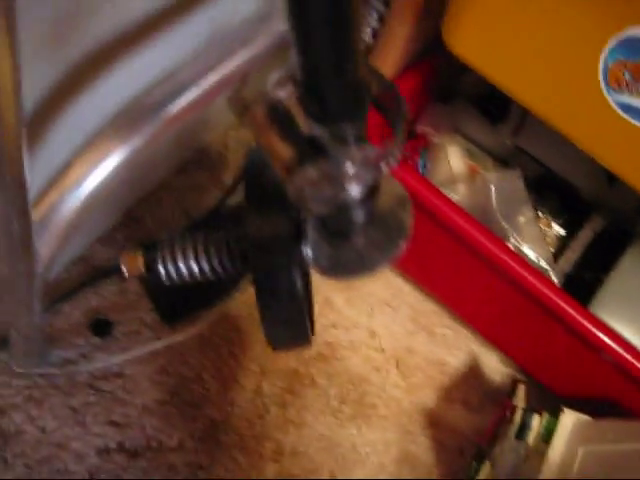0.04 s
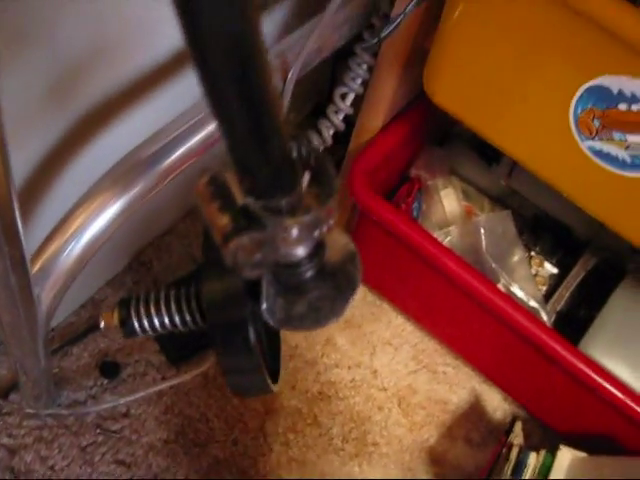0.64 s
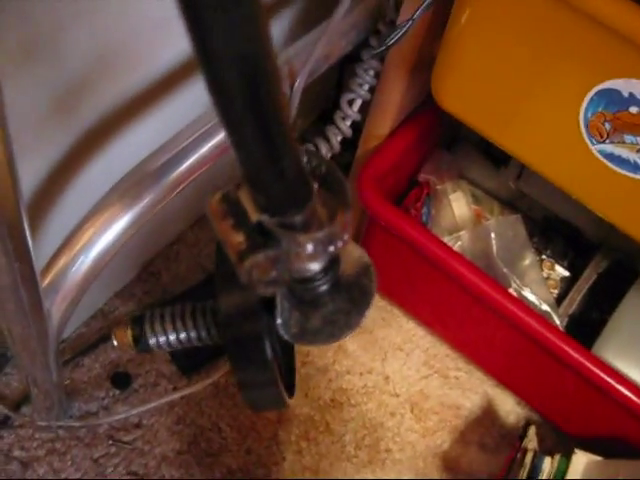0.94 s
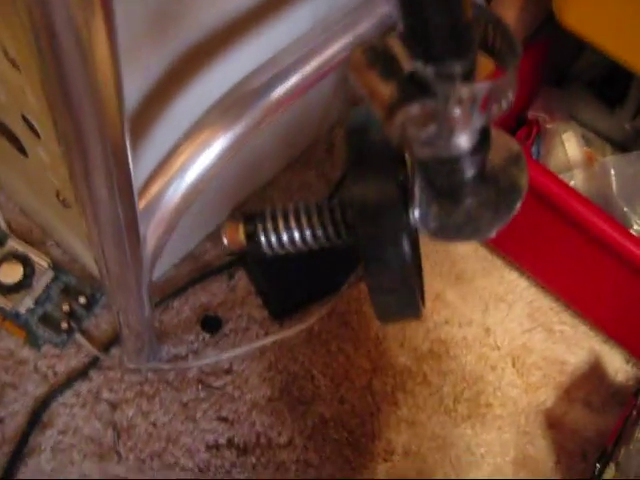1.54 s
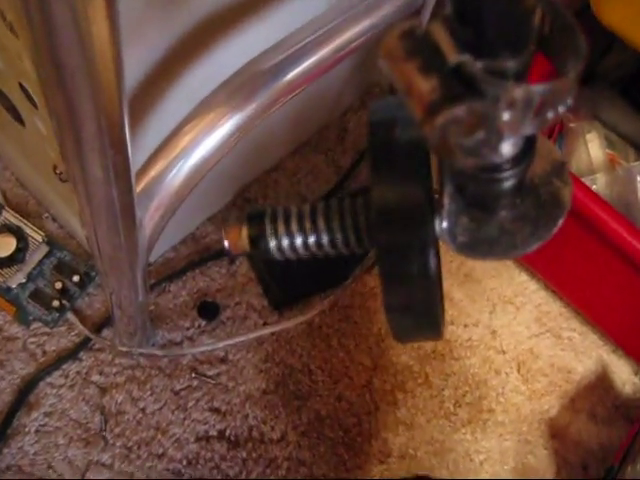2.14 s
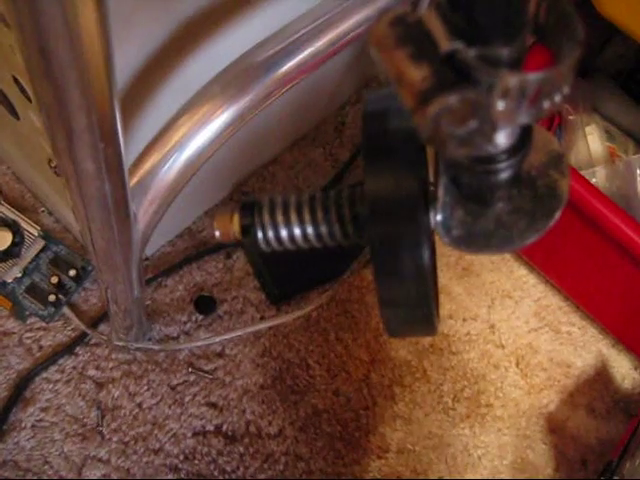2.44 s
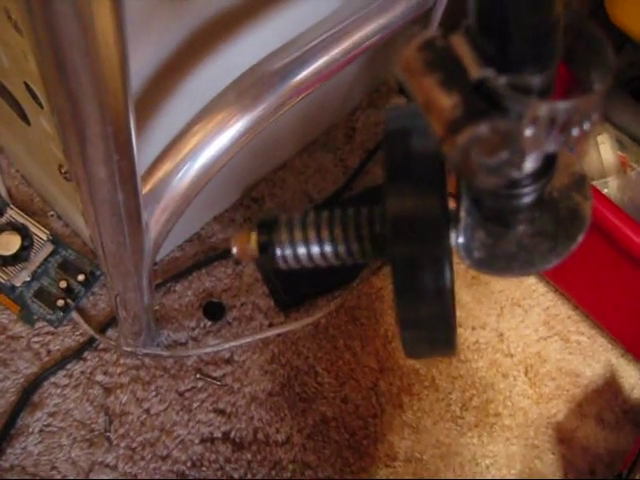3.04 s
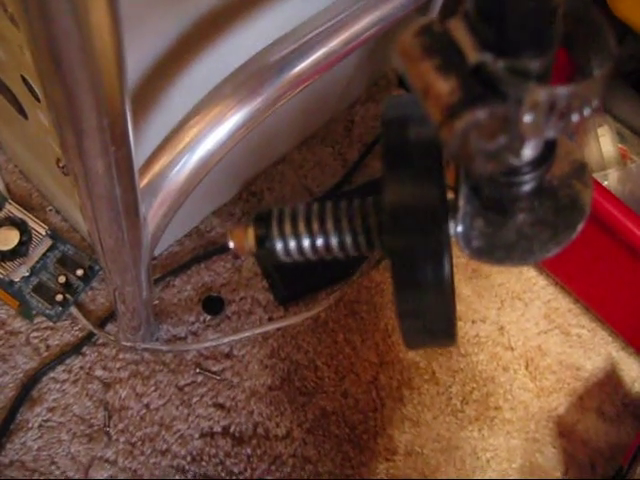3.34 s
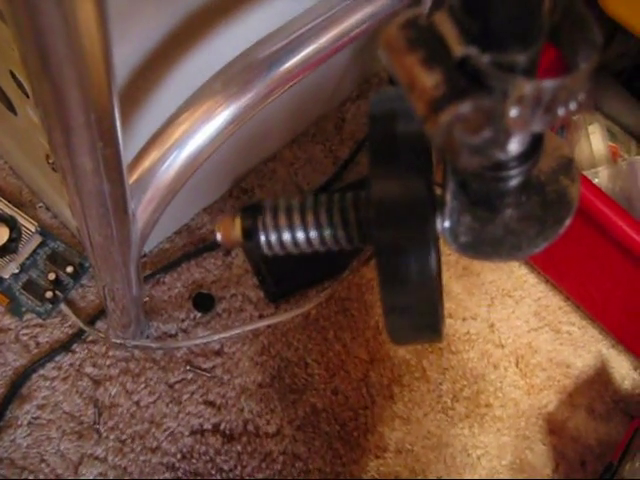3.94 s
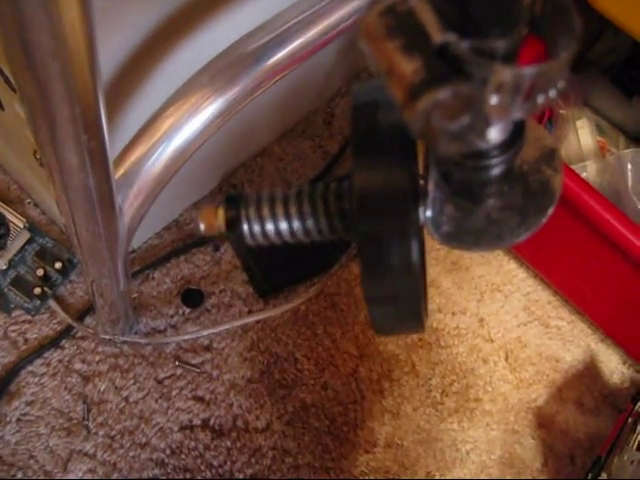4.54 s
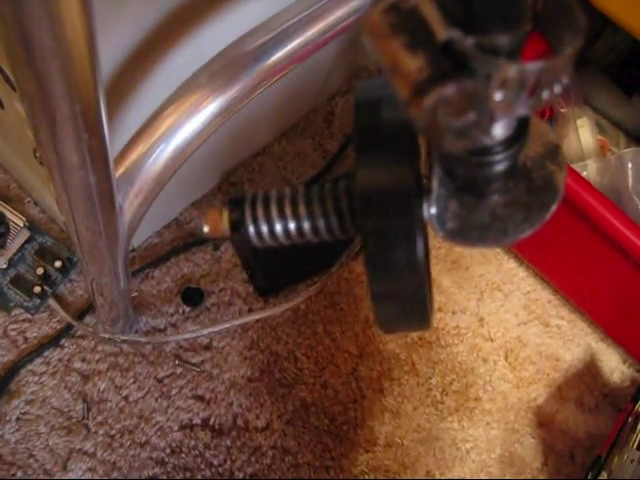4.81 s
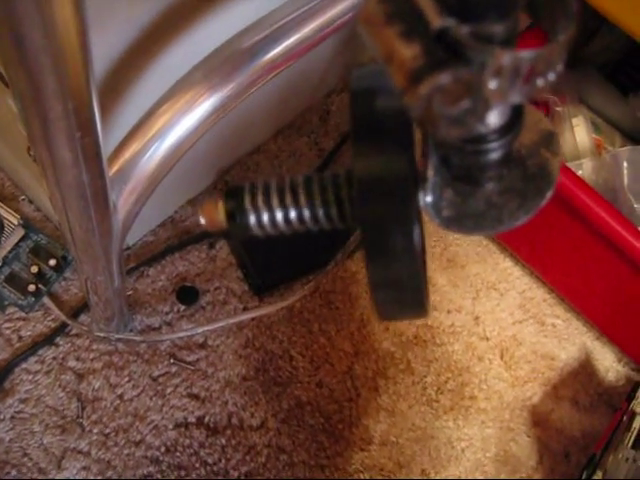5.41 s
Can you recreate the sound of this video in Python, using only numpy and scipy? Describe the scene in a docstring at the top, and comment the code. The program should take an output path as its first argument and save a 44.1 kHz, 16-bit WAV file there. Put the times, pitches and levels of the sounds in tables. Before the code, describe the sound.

A small plastic compressed-air engine runs close to the microphone in a carpeted room. Each turn gives a dry rattle, a spitting puff of air and a brief hollow ring, blending into a rapid clatter that keeps surging and sagging. It gradually gets faster and slightly louder, with hard rod knocks in the second half. A compressor hisses alongside throughout, its drone growing toward the end.

```python
"""A carpeted room: a small plastic compressed-air engine runs close by, hunting between about 9 and 17 turns a
second as its charge of air rises and falls. In each turn the valve opens and the drive rattles, the exhaust
port spits a puff, and the cylinder rings on the way back. In some late turns the rod knocks hard. A compressor
hums and rushes alongside, and a low drone grows late."""
import sys
import numpy as np
from scipy import signal
from scipy.fft import rfft, irfft, next_fast_len
from scipy.io import wavfile
from scipy.ndimage import map_coordinates

SR = 44100
rng = np.random.default_rng(int(sys.argv[2]) if len(sys.argv) > 2 else 0)


def master(y):
    """Save y as 16-bit WAV."""
    cut = np.clip(np.atleast_2d(y).T, -1, 1)
    pcm = np.round(cut * 32767)  # scale
    wavfile.write(sys.argv[1], SR, pcm.astype(np.int16))


N = 250047
TIME_S = np.arange(N) / SR

# Each row: time in seconds, speed in turns a second.
FLYWHEEL_RPS = [(0.0, 8.67), (0.69, 8.88), (0.89, 11.32), (1.03, 11.36), (1.24, 9.18), (1.52, 12.35),
                (1.84, 9.52), (1.99, 11.4), (2.32, 11.13), (2.55, 12.17), (2.8, 10.49), (3.06, 12.87),
                (3.25, 11.2), (3.45, 12.85), (3.8, 11.73), (4.0, 13.45), (4.25, 11.5), (4.49, 15.38),
                (4.8, 11.84), (5.09, 15.83), (5.36, 12.17), (5.56, 13.61), (5.67, 17.07)]
# Air let in by the valve. Each row: time in seconds, charge from 0 to 1.
AIR_CHARGE = [(0.05, 0.42), (0.73, 0.48), (0.83, 0.77), (1.1, 0.1), (1.4, 0.78), (1.65, 0.22), (1.75, 0.26),
              (1.85, 0.66), (2.21, 0.42), (2.48, 0.49), (2.64, 0.28), (3.0, 0.73), (3.08, 0.37),
              (3.49, 0.58), (3.65, 0.3), (3.9, 0.76), (4.13, 0.28), (4.3, 0.69), (4.45, 0.9), (4.66, 0.0),
              (4.81, 0.57), (5.03, 0.99), (5.16, 0.14), (5.31, 0.22), (5.39, 0.57), (5.54, 0.86),
              (5.61, 0.39)]
# More air opens the valve earlier, puffs harder and quiets the way back. Each row: charge from 0 to 1,
# power stroke as a share of the turn, then puff, spit, rattle, return and ring in relative dB.
TURN_BY_CHARGE = [(0, .15, -36, -34, -19, -23, -26.5), (.3, 0.23, -24, -19, -21, -23, -22.5),
                  (.6, 0.33, -22, -16.5, -20, -31, -33.5), (1, 0.478, -22.5, -17, -19, -33.5, -65)]
# The engine grows louder. Each row: time in seconds, gain in dB.
NEARNESS_DB = [(0, -2.5), (1.1, -1.7), (2.2, -0.5), (5.67, .5)]
# Hard rod knocks, each put on the nearest turn. Each row: time in seconds, relative level in dB.
HARD_KNOCKS_DB = [(3.16, -25.5), (4.05, -29.5), (4.13, -23), (4.22, -27.5), (4.58, -22), (4.66, -20.5),
                  (4.73, -20.5), (5.1, -26.5), (5.16, -18.5), (5.24, -20), (5.31, -23.5), (5.39, -32)]
# Each row: time in seconds, power share of the housing's late modes from 0 to 1.
HOUSING_LATE_SHARE = [(0, 0.34), (1.3, 0.46), (2.2, 0.34), (3.6, 1), (4.4, 0.95), (5.67, 0.82)]
# Air under the piston. Each row: time in seconds, pitch in Hz, relative level in dB,
# upper mode in dB against the lower.
HOLLOW_NOTE = [(0, 694, -18.5, 8), (0.799, 665, -16, 1), (1.701, 670, -10.5, -17), (2.5, 750.6, -14, -24),
               (3.4, 799, -12.5, -13), (3.999, 828, -11.5, -10), (4.499, 861, -9.5, -30),
               (5.67, 862, -7.5, -25)]
# Low drone. Each row: time in seconds, relative level in dB.
DRONE_DB = [(0.0, -45), (0.35, -46), (3.11, -44), (3.38, -36.5), (4.12, -39.5), (4.52, -34), (4.67, -36.5),
            (5.08, -33), (5.67, -33.5)]

# Resonances. Each row: centre in Hz, width in Hz, relative gain in dB.
HOUSING_EARLY_MODES = [(2915, 130, -8), (3520, 360, -18), (3970, 120, 0.5), (4220, 110, -8),
                       (4577, 78, 4.5), (4695, 35, 6.5)]
HOUSING_LATE_MODES = [(2480, 34, -8.5), (2974, 60, -8), (3143, 106, -4.5), (3755, 31, 0.5), (4090, 81, 0),
                      (4500, 110, -16), (4475, 83, 6.5)]
CYLINDER_MODES = [(700, 16, -7.5), (1440, 28, -.5), (2300, 70, -12)]
MOUNT_MODES = [(485, 110, 7), (655, 160, -3), (930, 150, 1.5), (1250, 220, 2), (1750, 60, -1),
               (1930, 110, -28.5), (2400, 330, -25), (3090, 200, -20)]
VALVE_MODES = [(6960, 1400, -1), (14100, 550, 0)]
PORT_MODES = [(5250, 350, 0), (9200, 430, 21), (10300, 420, -21), (14000, 700, -5)]
FLOOR_MODES = [(72, 13, 0)]
DRONE_MODES = [(416, 140, 5), (854, 110, -1)]

# Noise spectra. Each row: frequency in Hz, relative density in dB.
RATTLE_SPECTRUM = [(150, -28), (400, -16), (600, -8.5), (900, -9), (1150, -5.5), (1600, -8.5), (2500, -9),
                   (3500, -7.5), (4700, -12.5), (5600, -6.5), (7000, -17), (10000, -11), (14000, -29),
                   (16000, -19)]
SPIT_SPECTRUM = [(300, -50), (600, 11.5), (1400, -25), (3000, -13), (5500, 3.5), (7000, 0.5), (10000, 5),
                 (12500, 1.5), (16000, 0)]
CLATTER_SPECTRUM = [(200, -28), (500, -11), (1100, 6.5), (1800, 9), (2500, 12.5), (4000, 4), (5600, 6.5),
                    (7000, -7), (10000, 0.5), (13000, -26.5), (16000, -1)]
LEAK_SPECTRUM = [(200, -26), (500, -15), (1000, -29), (1600, -9), (2600, -18), (4500, -4), (5300, -14.5),
                 (7000, -9.5), (10500, -13.5), (13000, -16.5), (16000, -24)]
COMPRESSOR_SPECTRUM = [(20, -22), (55, -1), (88, -6), (130, -16), (250, -2), (450, 0), (600, 2),
                       (1500, 1.5), (4400, 8), (5500, -7), (10000, -2), (16000, -11)]
CLOSING_SPECTRUM = [(1000, -41), (4000, -8), (6000, 0), (11000, 18), (16000, -2)]

# Room tail. Each row: frequency in Hz, time to fall 60 dB in seconds.
ROOM_T60_S = [(100, 0.36), (1000, 0.11), (5000, 1), (16000, 0.33)]


def engine_turns(first_exhaust_s=.046):
    """Flywheel speed and air charge set the timing and levels of each turn."""
    speed_rps = curve(FLYWHEEL_RPS)
    revs = np.cumsum(speed_rps) / SR
    revs -= np.interp(first_exhaust_s, TIME_S, revs)
    exhaust_s = np.interp(np.arange(int(revs[-1]) + 1), revs, TIME_S)
    turn_rps = np.interp(exhaust_s, TIME_S, speed_rps)
    octaves = np.log2(turn_rps / speed_rps.mean())
    charge, near_db = curve(AIR_CHARGE, exhaust_s), curve(NEARNESS_DB, exhaust_s)
    power_share, puff_db, spit_db, rattle_db, return_db, ring_db = columns(TURN_BY_CHARGE, charge)
    power_s = power_share / turn_rps
    knock_db = -42 + 12 * octaves  # light knock in every turn
    for at_s, db in HARD_KNOCKS_DB:
        knock_db[np.argmin(abs(exhaust_s - at_s))] = db
    return dict(
        open_s=exhaust_s - power_s, exhaust_s=exhaust_s, power_s=power_s, period_s=np.gradient(exhaust_s),
        phase=np.interp(TIME_S, exhaust_s, np.arange(len(exhaust_s))) % 1,  # per sample, 0 at exhaust
        puff_db=puff_db + near_db + 3 * octaves,  # a fast piston pushes harder
        ring_db=ring_db - 4.5 * octaves,  # a slow one leaves more time to ring
        return_db=return_db + near_db + 1.5 * octaves,
        spit_db=spit_db + near_db, rattle_db=rattle_db + near_db, knock_db=knock_db)


def power_stroke(turns):
    """The piston strikes the valve open, then chatters under load until the exhaust."""
    open_s, end_s, db = turns["open_s"], turns["exhaust_s"], turns["rattle_db"]
    chatter = ticks(rate_hz=600, scatter_db=3, rub=.8)
    load = strokes(open_s, end_s, db, rise_s=.0011, fall_s=.0021)
    strike = strokes(open_s, open_s + .0015, db - 10, rise_s=.0006, fall_s=.003)
    # The spectrum widens as the piston gathers speed.
    spread = strokes(open_s, end_s, db, rise_s=.007, fall_s=.003, swell_db=2)
    scrape = amp(-3) * coloured(chatter + noise(), RATTLE_SPECTRUM)
    return amp(-2.5) * housing(chatter) * (load + strike) + scrape * spread


def housing(x, low_hz=2100, high_hz=5300):
    """The housing rings in a band, drifting between two sets of modes."""
    late = curve(HOUSING_LATE_SHARE)
    x = filtered(x, lambda f: (f / low_hz) ** 3 / (1 + (f / low_hz) ** 3) / (1 + (f / high_hz) ** 12))
    early_ring = np.sqrt(1 - late) * resonate(x, HOUSING_EARLY_MODES)
    return early_ring + np.sqrt(late) * resonate(x, HOUSING_LATE_MODES)


def exhaust(turns, thump_hz=268, attack_s=.0012, release_s=.0025, spit_width_s=.00088, gain_db=6):
    """The port opens briefly: the cylinder's air swings once, with a jet of hiss at the centre."""
    puff, jet = np.zeros(N), np.zeros(N)
    for at_s, puff_db, spit_db in zip(turns["exhaust_s"], turns["puff_db"], turns["spit_db"]):
        span = slice(int(at_s * SR) - SR // 100, int(at_s * SR) + SR // 100)
        t = TIME_S[span] - at_s
        swing = np.exp(-(t / np.where(t > 0, release_s, attack_s)) ** 2 / 2)
        puff[span] -= amp(puff_db + gain_db) * swing * np.cos(2 * np.pi * thump_hz * t)
        jet[span] += amp(spit_db + gain_db) * np.exp(-(t / spit_width_s) ** 2 / 2)
    # A small port radiates little bass.
    radiated = filtered(puff, lambda hz: -hz * hz / (125 ** 2 - hz * hz + 140j * hz))
    return radiated + jet * coloured(noise(), SPIT_SPECTRUM)


def cylinder_ring(turns, glide=.03):
    """The cylinder rings after the puff, rising slightly as the piston returns."""
    bend = 1 + glide * np.clip(8 * turns["phase"] - 1, -1, 1)
    tone = unit(sum(amp(db) * fuzzy_tone(hz * bend, width_hz) for hz, width_hz, db in CYLINDER_MODES))
    start_s = turns["exhaust_s"] + .05 * turns["period_s"]
    end_s = turns["exhaust_s"] + .17 * turns["period_s"]
    return tone * strokes(start_s, end_s, turns["ring_db"] + 4, rise_s=.003, fall_s=.004, swell_db=2)


def rod_knocks(turns):
    """The unloaded rod clatters in its play; hard knocks also shake the mount."""
    at_s, knock_db, ring_db = turns["exhaust_s"], turns["knock_db"], turns["ring_db"]
    boom = fuzzy_tone(hz=440, width_hz=28)
    boom *= strokes(at_s + .004, at_s + .015, knock_db + .5, rise_s=.003, fall_s=.007, swell_db=2)
    slap = resonate(ticks(rate_hz=470, scatter_db=5, rub=.38), MOUNT_MODES)
    slap *= strokes(at_s + .002, at_s + .02, .8 * knock_db + .2 * ring_db + 2, rise_s=.003, fall_s=.003)
    clatter = coloured(ticks(rate_hz=800, scatter_db=2, rub=.5), CLATTER_SPECTRUM)
    clatter_db = .3 * ring_db + .14 * knock_db - 12.5
    end_s = at_s + .18 * turns["period_s"]
    clatter *= strokes(at_s + .0012, end_s, clatter_db, rise_s=.0023, fall_s=.0049)
    return boom + slap + clatter


def port_closing(turns):
    """The returning piston covers the port with a thin, short hiss."""
    at_s = turns["exhaust_s"] + .12 * turns["period_s"]
    hiss = coloured(noise(), CLOSING_SPECTRUM)
    return hiss * strokes(at_s, at_s + .0016, turns["ring_db"] - 5, rise_s=.00047, fall_s=.001)


def return_stroke(turns, rest_s=.012):
    """The coasting drive ticks and air leaks past the piston; both fade before the valve reopens."""
    start_s, period_s, db = turns["exhaust_s"], turns["period_s"], turns["return_db"]
    next_open_s = start_s + period_s - np.roll(turns["power_s"], -1)
    end_s = np.minimum(start_s + .54 * period_s, next_open_s - rest_s)
    chatter = ticks(rate_hz=260, scatter_db=3.5, rub=.6)
    ring = amp(-3) * housing(chatter) * strokes(start_s, end_s, db, rise_s=.003, fall_s=.007)
    leak = strokes(start_s, end_s, .5 * db - 16, rise_s=.0005, fall_s=.012, swell_db=-3)
    return ring + amp(.5) * coloured(noise(), LEAK_SPECTRUM) * leak


def hollow_note(turns, bend=.12, upper_ratio=1.66):
    """Air under the piston hums, dropping on the way down; the way back is louder in fast turns."""
    at_s, period_s, rattle_db = turns["exhaust_s"], turns["period_s"], turns["rattle_db"]
    hz, db, upper_db = columns(HOLLOW_NOTE, TIME_S)
    height = (1 - np.cos(2 * np.pi * turns["phase"])) / 2
    hz *= 1 + bend * (np.minimum(height, .5) - .25)
    tone = fuzzy_tone(hz, width_hz=27.1) + amp(upper_db) * fuzzy_tone(upper_ratio * hz, width_hz=59.9)
    down = strokes(turns["open_s"], at_s, rattle_db, rise_s=.0062, fall_s=.0022, swell_db=3.5)
    up_db = rattle_db - 8 - 14 * np.log2(period_s / period_s.mean())
    up = strokes(at_s + .29 * period_s, at_s + .42 * period_s, up_db, rise_s=.0043, fall_s=.0047)
    return amp(db) * tone * (down + up)


def air_jets(turns):
    """Air whistles through the valve under power and trails from the port after each puff."""
    open_s, at_s = turns["open_s"], turns["exhaust_s"]
    inlet = strokes(open_s, at_s, turns["rattle_db"] - 19, rise_s=.0016, fall_s=.002, swell_db=-7)
    trail = strokes(at_s, at_s + .0044, turns["spit_db"] - 20, rise_s=.0006, fall_s=.007)
    return resonate(noise(), VALVE_MODES) * inlet + resonate(noise(), PORT_MODES) * trail


def floor_thud(turns, growth=1.8):
    """Each puff kicks the stand; the floor thuds faintly."""
    kicks = np.bincount((turns["exhaust_s"] * SR).astype(int), amp(growth * turns["puff_db"]), N)
    return amp(turns["puff_db"].mean() - 31) * resonate(kicks, FLOOR_MODES)


def background():
    """Steady rush of compressor motor and air, a soft hum, and a drone near 420 and 850 Hz that grows late."""
    drone = amp(curve(DRONE_DB) - 3.5) * resonate(noise(), DRONE_MODES)
    hum = amp(-59.5) * fuzzy_tone(hz=88, width_hz=3.96)
    rush = amp(-34.5) * coloured(noise(), COMPRESSOR_SPECTRUM)
    return drone + hum + rush


def room(x, echo_s=.0139, echo_cutoff_hz=600, echo_db=-14, tail_db=-15):
    """Dull ceiling echo and a short, carpeted tail."""
    hz, t, spectra = signal.stft(rng.standard_normal(SR // 3), SR, nperseg=256)
    decay = amp(-60 * t / log_curve(ROOM_T60_S, hz)[:, None])
    _, tail = signal.istft(spectra * decay, SR, nperseg=256)
    wash = signal.fftconvolve(x, tail / np.linalg.norm(tail))[:N]
    echo = filtered(x, lambda f: np.exp(-2j * np.pi * f * echo_s) / (1 + 1j * f / echo_cutoff_hz))
    return x + amp(echo_db) * echo + amp(tail_db) * wash


def ticks(rate_hz, scatter_db, rub, contact_s=.0004):
    """Loose parts scuff at uneven gaps around 1 / rate_hz, over rubbing noise."""
    log_gap, size = rng.uniform(-1, 1, (2, 9000))
    at = (np.cumsum(np.exp(log_gap)) / rate_hz * SR).astype(int)
    blows = np.bincount(at[at < N], amp(scatter_db * size)[at < N], N)
    contact = signal.lfilter([1], [1, -np.exp(-1 / (contact_s * SR))], blows)
    return unit(contact * noise()) + rub * noise()


def fuzzy_tone(hz, width_hz, waver_hz=150):
    """An air-driven resonance of wavering pitch, rms 1."""
    knots = rng.standard_normal(int(N * waver_hz / SR) + 4)
    waver = map_coordinates(knots, [TIME_S * waver_hz])
    return unit(np.sin(2 * np.pi * np.cumsum(hz + width_hz * waver) / SR))


def strokes(starts_s, ends_s, levels_db, rise_s, fall_s, swell_db=0):
    """Envelope: opens at each start, ramps by swell_db to its level, decays after each end."""
    envelope = np.zeros(N)
    for start_s, end_s, db in zip(starts_s, ends_s, levels_db):
        span = slice(max(0, int(start_s * SR) + 1), int((end_s + .08) * SR))
        t = TIME_S[span]
        progress = np.clip((t - start_s) / max(end_s - start_s, 1e-3), 0, 1)
        attack = 1 - np.exp((start_s - t) / rise_s)
        release = np.exp(-np.maximum(t - end_s, 0) / fall_s)
        envelope[span] += amp(db + swell_db * (progress - 1)) * attack * release
    return envelope


def resonate(x, modes):
    """x through parallel resonances, rms 1."""
    def response(hz):
        return sum(amp(db) * 1j * hz * width_hz / (centre_hz ** 2 - hz * hz + 1j * hz * width_hz)
                   for centre_hz, width_hz, db in modes)
    return unit(filtered(x, response))


def coloured(x, spectrum):
    """x shaped by a spectrum, rms 1."""
    return unit(filtered(x, lambda hz: amp(log_curve(spectrum, hz))))


def filtered(x, response):
    """x through a complex frequency response."""
    size = next_fast_len(N + SR // 2)
    return irfft(rfft(x, size) * response(np.fft.rfftfreq(size, 1 / SR)), size)[:N]


def columns(table, at):
    """Later columns, interpolated along the first."""
    axis, *values = np.transpose(table)
    return [np.interp(at, axis, column) for column in values]


def curve(table, at_s=TIME_S):
    """One value, interpolated in time."""
    return columns(table, at_s)[0]


def log_curve(table, hz):
    """One value, interpolated in log frequency."""
    knots_hz, values = np.transpose(table)
    return np.interp(np.log(hz + 1), np.log(knots_hz + 1), values)


def noise():
    """White noise."""
    return rng.standard_normal(N)


def amp(db):
    """Decibels to gain."""
    return 10 ** (np.asarray(db) / 20)


def unit(x):
    """Scaled to rms 1."""
    return x / np.sqrt(np.mean(x ** 2) + 1e-20)


def scene():
    """The engine in its room, beside the compressor."""
    turns = engine_turns()
    engine = (power_stroke(turns) + exhaust(turns) + cylinder_ring(turns) + rod_knocks(turns)
              + port_closing(turns) + return_stroke(turns) + hollow_note(turns) + air_jets(turns))
    return (room(engine) + floor_thud(turns) + background())[None]


def record(dry, notch_hz=7900, half_width_hz=750, top_hz=15950):
    """The microphone has a deep treble notch and a hard band limit."""
    def response(hz):
        notch = (hz - notch_hz) / (hz - notch_hz - 1j * half_width_hz)
        return notch * (hz < top_hz)
    return filtered(dry[0], response)[None]


dry = scene()
out = record(dry)
master(out)
```